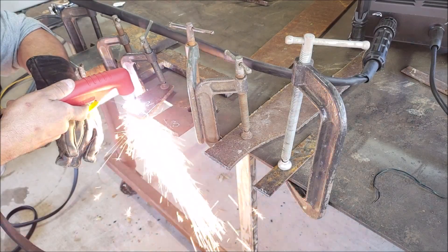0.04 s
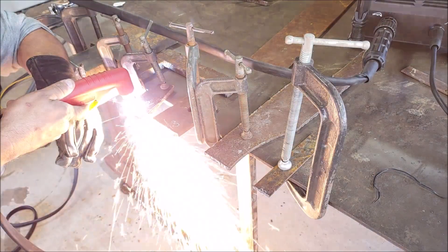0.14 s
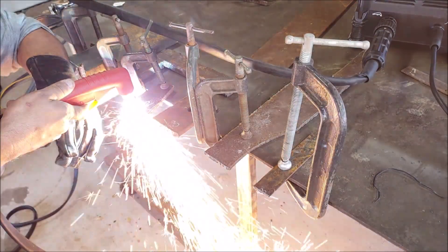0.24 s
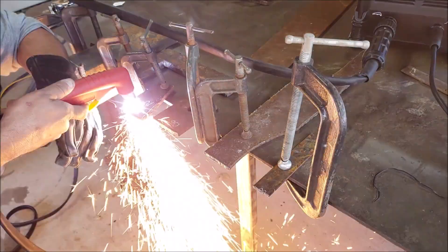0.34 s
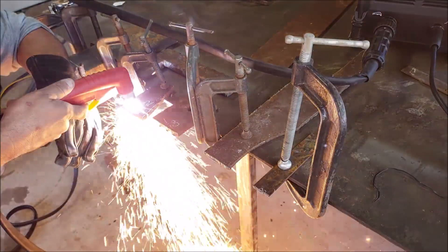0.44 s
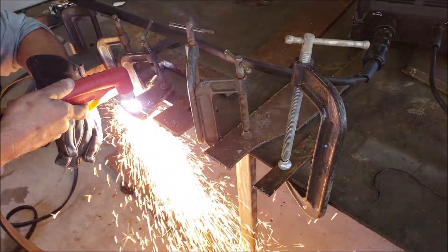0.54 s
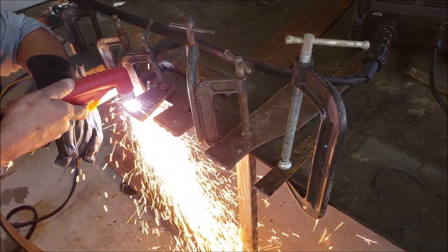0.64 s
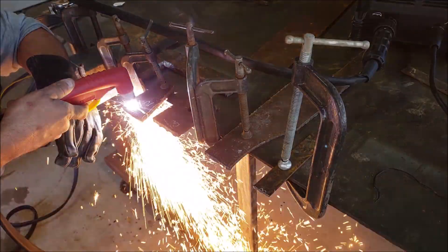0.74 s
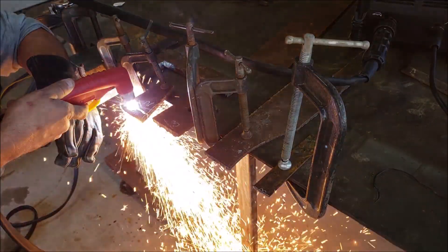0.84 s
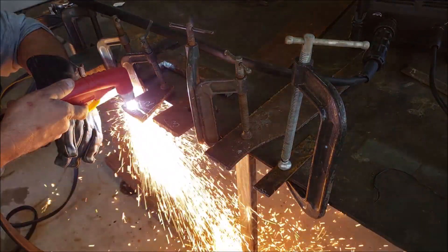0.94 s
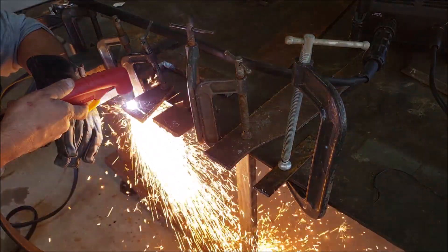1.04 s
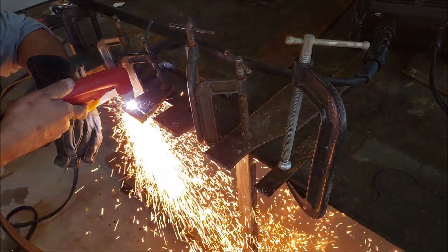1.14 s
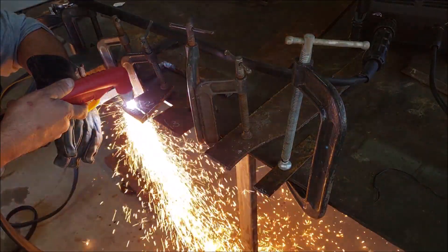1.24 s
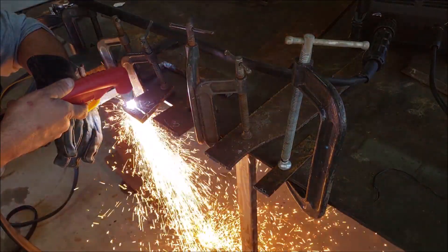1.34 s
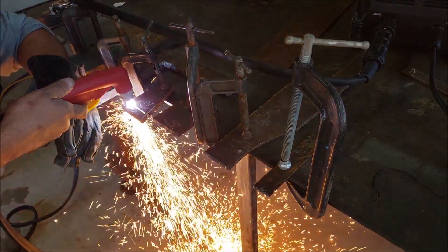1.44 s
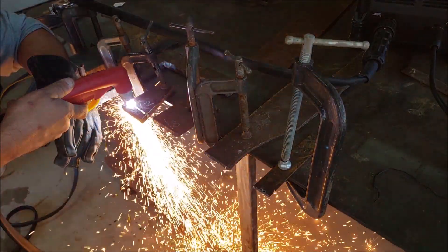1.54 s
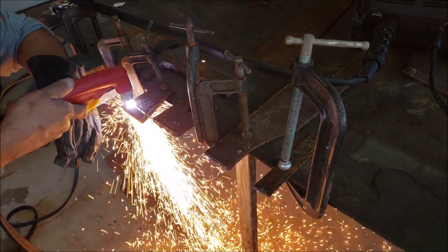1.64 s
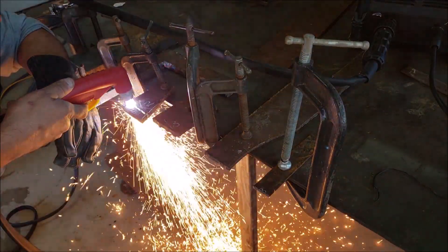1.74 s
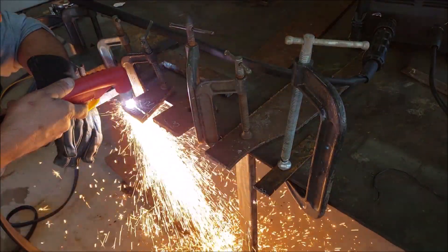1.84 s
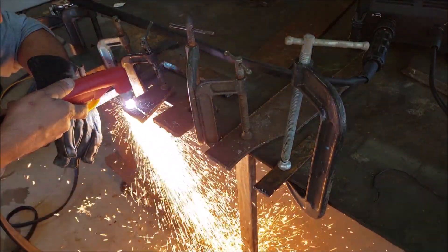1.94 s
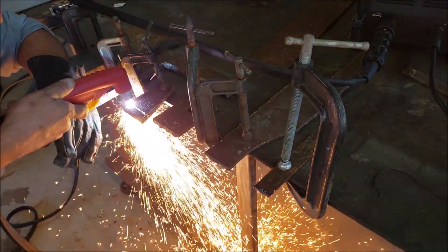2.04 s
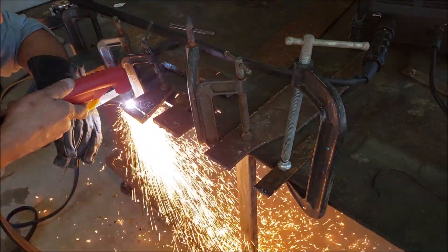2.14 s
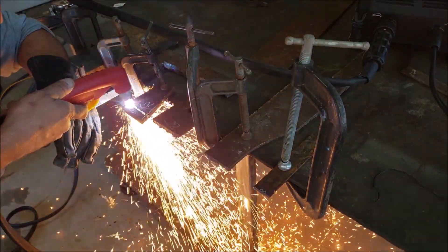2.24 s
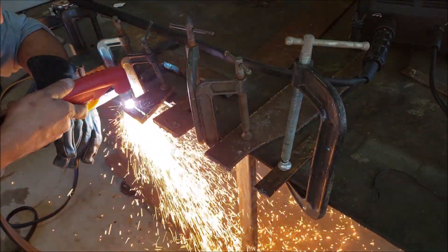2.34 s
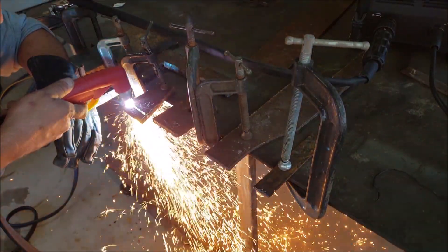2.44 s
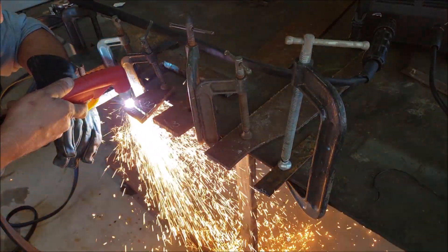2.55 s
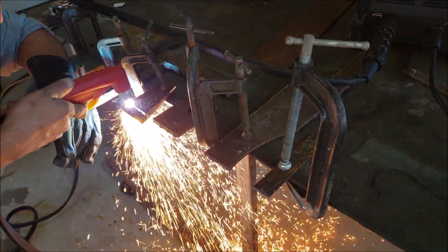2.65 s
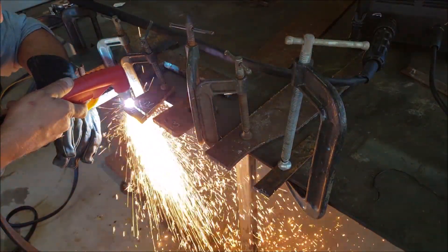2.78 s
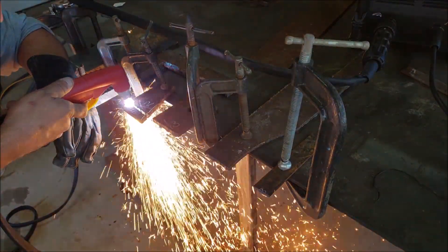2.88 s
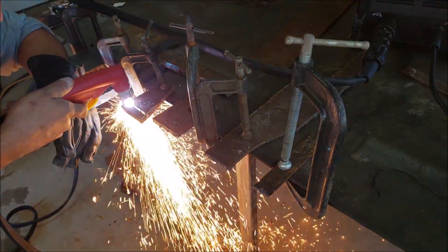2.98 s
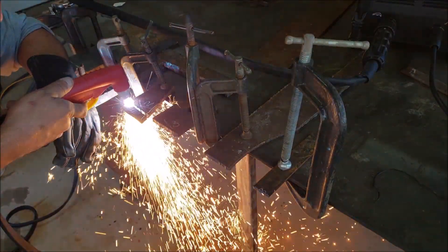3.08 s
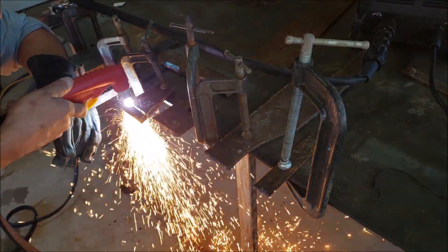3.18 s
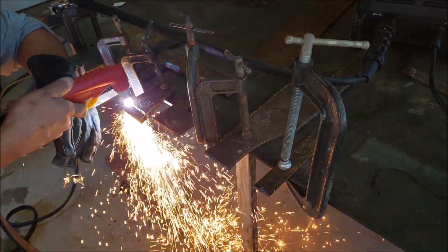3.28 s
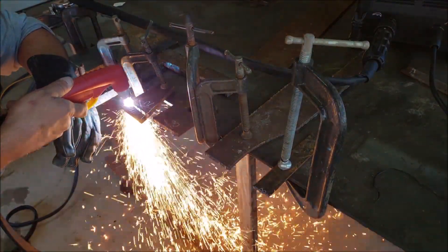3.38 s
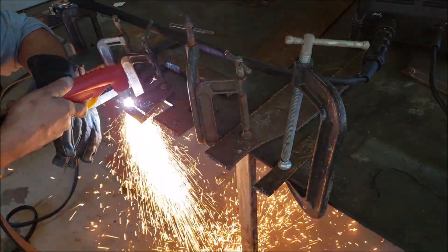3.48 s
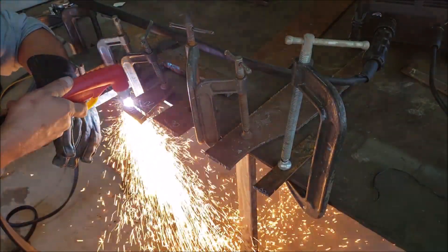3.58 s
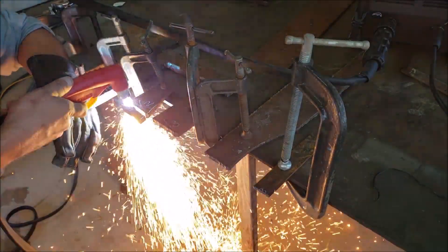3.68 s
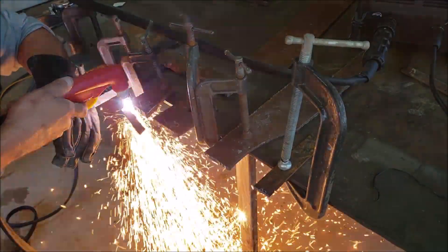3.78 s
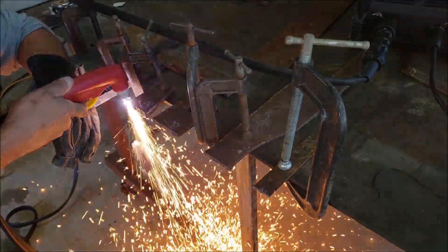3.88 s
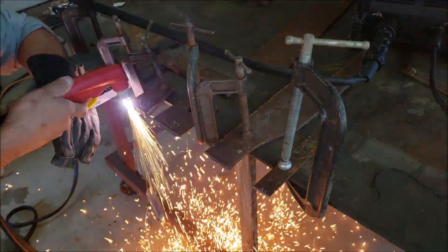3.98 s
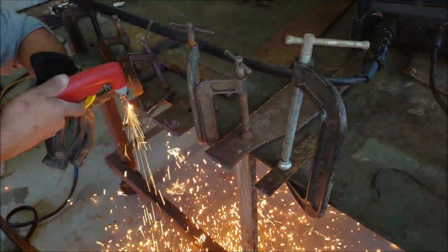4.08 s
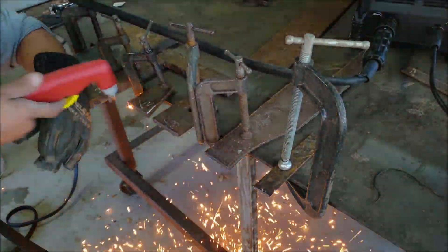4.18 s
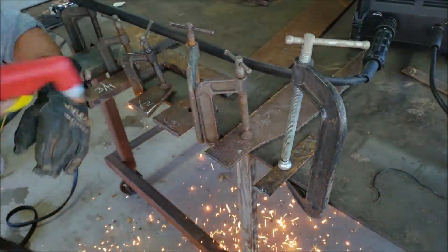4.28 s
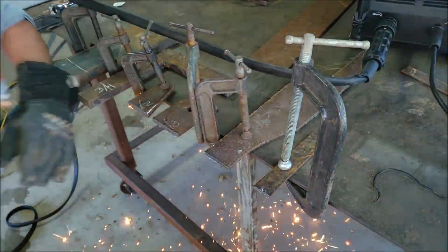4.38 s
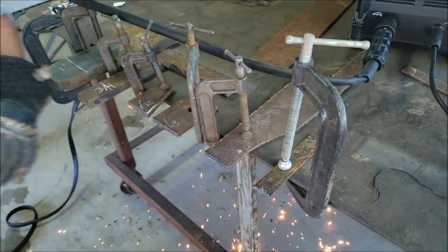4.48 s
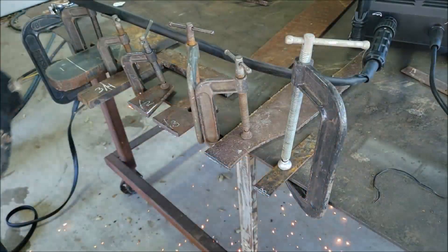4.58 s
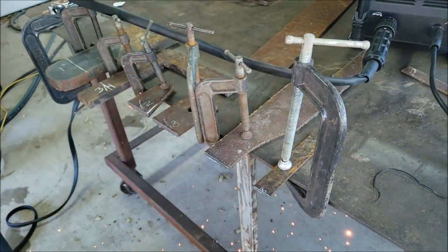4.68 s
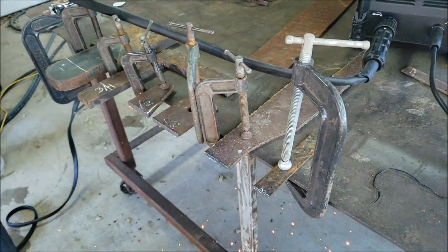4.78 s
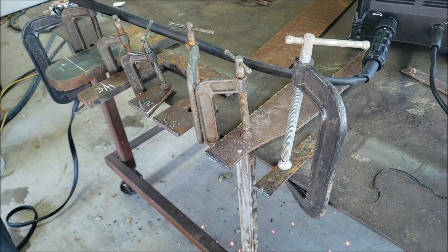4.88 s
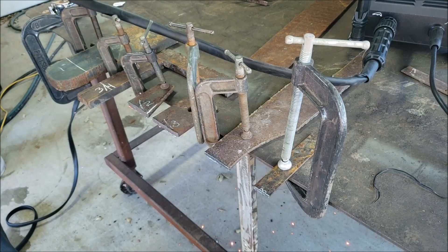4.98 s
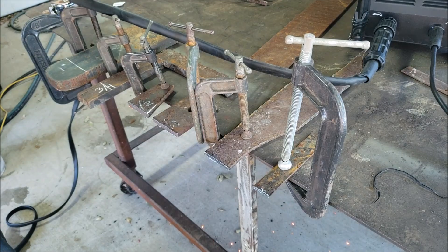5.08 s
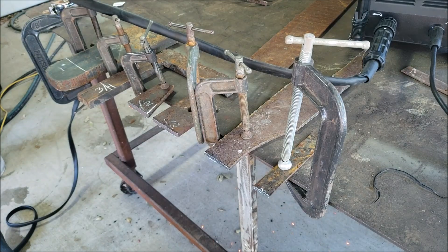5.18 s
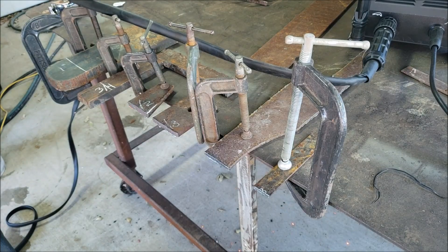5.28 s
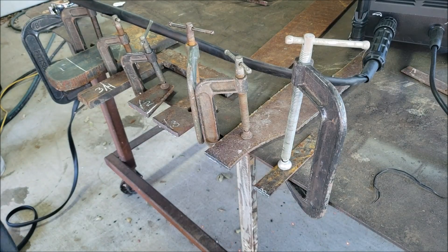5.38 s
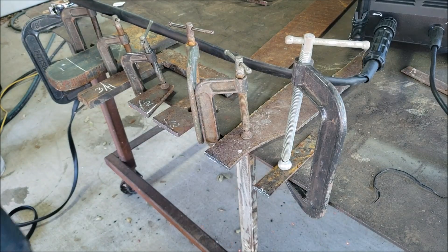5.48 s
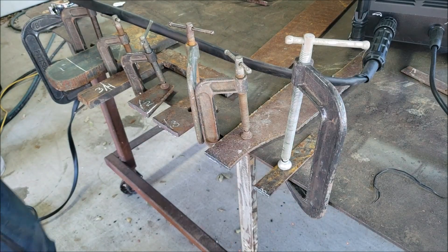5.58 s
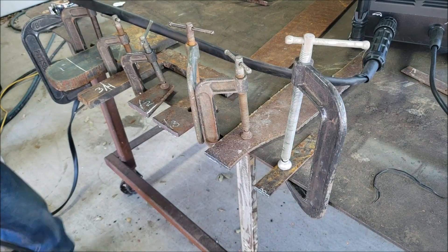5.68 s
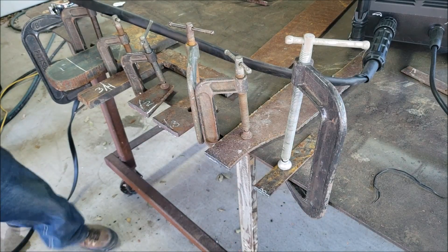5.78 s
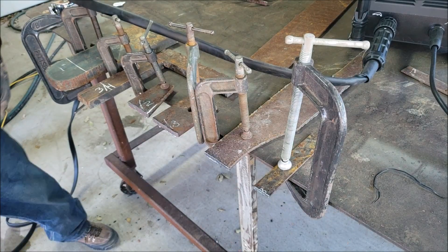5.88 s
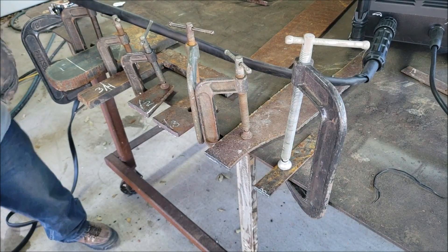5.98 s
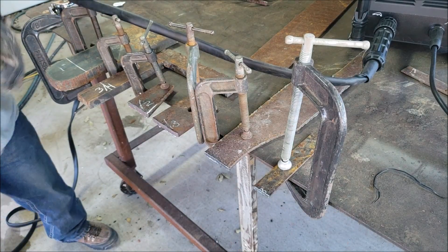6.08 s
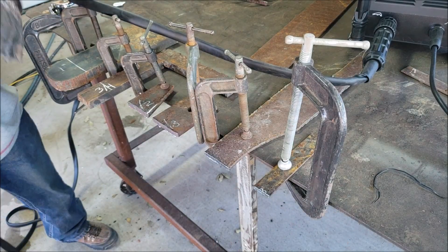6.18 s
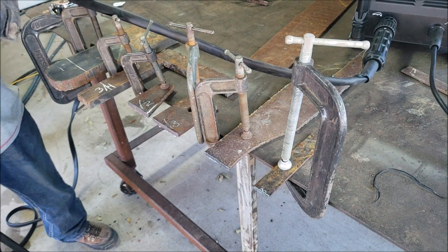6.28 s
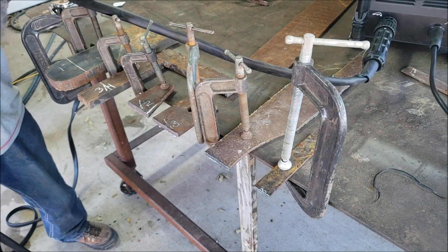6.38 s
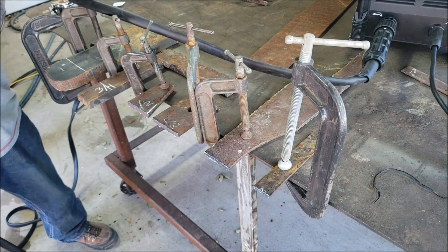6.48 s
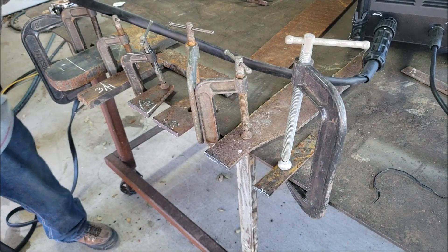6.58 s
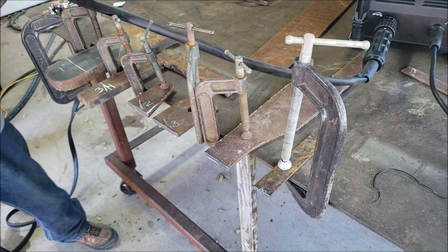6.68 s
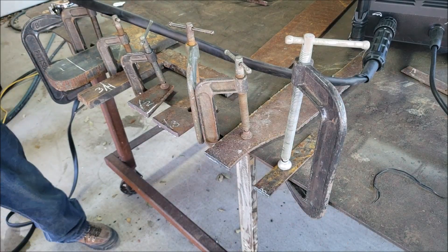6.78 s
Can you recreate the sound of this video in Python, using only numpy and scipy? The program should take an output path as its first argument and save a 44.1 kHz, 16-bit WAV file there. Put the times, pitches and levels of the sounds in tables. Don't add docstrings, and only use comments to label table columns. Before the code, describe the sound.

Harsh, bright cutting roar with spurts of molten metal ends abruptly in a pop, leaving soft cooling air that sweeps left and a low machine whir.

```python
import sys
import numpy as np
from scipy import signal
from scipy.fft import rfft, irfft, next_fast_len
from scipy.io import wavfile
from scipy.ndimage import uniform_filter1d, map_coordinates

SR = 44100
rng = np.random.default_rng(int(sys.argv[2]) if len(sys.argv) > 2 else 0)


def persist_wave(psi):
    counts = np.round(np.clip(psi, -1, 1) * 32767).astype(np.int16)
    wavfile.write(sys.argv[1], SR, np.atleast_2d(counts).T)


def gain_from_db(level_db):
    decades = np.asarray(level_db, float) / 20
    return 10 ** decades


N = 301203
SIZE, HOP = 256, 64
ARC_OUT = 4.077

# [f/Hz, t60/s]
WALLS_T60 = [(200, 0.29), (2000, 0.22), (8000, 0.27), (15000, 0.2)]
# [f/Hz, level/dB]
ROOM_LEVEL = [(40, 3.5), (200, 2), (1500, 1.5), (3300, 6), (4500, 1.5), (8000, 7.5), (12500, 0), (15000, 2)]
# [t/s, level/dB]
CAMERA_GAIN = [(4.3, 0), (4.9, -1), (5.5, 5), (6.0, 5.5), (6.5, 11.5), (6.83, 16)]
# [t/s, level/dB, half length/s]
AIR_SWEEPS = [
    (4.62, 5, .07),
    (5.33, 4.5, 0.16),
    (6.01, 2.5, 0.025),
]


def unit(x):
    return x / np.sqrt(np.mean(np.abs(x) ** 2) + 1e-20)


def along(points, hz):
    f, v = np.transpose(points)
    return np.interp(np.log(hz + 1), np.log(f + 1), v)


def curves(rows, t):
    s, *cols = np.transpose(rows)
    return [np.interp(t, s, c) for c in cols]


def swells(rows, t):
    return sum(db * np.exp(-((t - s) / half) ** 2) for s, db, half in rows)


def wobble(rate, count):
    step = rate * HOP / SR
    return map_coordinates(rng.standard_normal(int(count * step) + 4), [np.arange(count) * step])


def frames(x):
    hz, t, z = signal.stft(x, SR, nperseg=SIZE, noverlap=SIZE - HOP)
    return hz[:, None], t, z


def samples(z):
    return signal.istft(z, SR, nperseg=SIZE, noverlap=SIZE - HOP)[1][..., :N]


def filtered(x, response):
    m = next_fast_len(x.shape[-1] + 8192)
    spectrum = rfft(x, m) * response(np.fft.rfftfreq(m, 1 / SR))
    return irfft(spectrum, m)[..., :x.shape[-1]]


def diffuse(noise):
    spacing_m, alike = 0.13, 0.52

    def mix(hz):
        turn = np.arccos(alike * np.sinc(2 * hz * spacing_m / 343)) / 2
        return np.array([np.cos(turn), np.sin(turn)])

    mid, side = filtered(noise, mix)
    return np.array([mid + side, mid - side])


def effort(t):
    # [t/s, level/dB]
    cut = [(0, -22.5), (.04, -22), (.12, -23), (.18, -24.5), (.55, -26), (1.5, -29), (2.9, -27.5),
           (3.84, -27.5), (3.92, -26), (4.06, -28.5)]
    arc_parts = [-0.5, -13.5, -19, -32]
    air_parts = [0.5, -12.5, -19.5, -40.5]
    # [t/s, level/dB, half length/s]
    gouts = [
        (1.05, 13, 0.027),
        (1.95, 10.5, 0.08),
        (2.84, 15, 0.024),
        (3.29, 6, 0.036),
        (3.72, 9.5, 0.062),
        (4.05, 7, 0.016),
    ]
    gout_share = [0.019, 0.027, 0.13, 0.58]
    sweep_share = [1, 0.36, 0.36, .3]
    pierce_s, air_db = 0.27, -46
    unpierced_db = [-0.5, 0, -13.5, -6.5]

    def col(v):
        return np.array(v)[:, None]

    arc = curves(cut, t)[0] + col(arc_parts)
    arc = arc + col(unpierced_db) * np.clip(1 - t / pierce_s, 0, 1)
    arc = arc + col(gout_share) * swells(gouts, t)
    air = air_db + curves(CAMERA_GAIN, t)[0] + col(air_parts)
    air = air + col(sweep_share) * swells(AIR_SWEEPS, t)
    return np.where(t < ARC_OUT, arc, air)


def jet():
    parts_hz = [14000, 5280, 1500, 490]
    # [f/Hz, level/dB per Hz]
    colour = [(40, -75), (60, -29), (139, -19), (280, -41.5), (426, -21), (730, -28.5), (839, -21.5),
              (1190, -24), (2340, -18), (4300, -10.5), (6400, -9.5), (7500, -10), (8670, -14.5),
              (10400, -11), (12300, -3.5), (15900, -2)]
    hz, t, z = frames(rng.standard_normal((3, N)))
    sputter = (t < ARC_OUT) * wobble(14, count=len(t))
    depth_db = [0.11, 0.57, 0.34, 0.6]
    power = 0
    for k, db in enumerate(effort(t)):
        share = along(list(zip(parts_hz[::-1], np.arange(4)[::-1] == k)), hz)
        part = share * gain_from_db(2 * along(colour, hz))
        flicker_db = depth_db[k] * (sputter + 1.24 * wobble(30, count=len(t)))
        power = power + part / part.mean() * gain_from_db(2 * (db + flicker_db + 1.43))

    patches = uniform_filter1d(rng.standard_normal(power.shape), size=5, axis=0)
    patches = uniform_filter1d(patches, size=30, axis=1)
    power = power * gain_from_db(2.98 * unit(patches))

    keep = gain_from_db(-2 * 60 * HOP / SR / along(WALLS_T60, hz))[:, 0]
    stored = [signal.lfilter([1 - k], [1, -k], p, zi=[k * p[0]])[0] for k, p in zip(keep, power)]
    direct = samples(z[0] * np.sqrt(power))
    walls = samples(z[1:] * np.sqrt(np.array(stored)) * gain_from_db(along(ROOM_LEVEL, hz)))
    return direct, diffuse(walls)


def small_sounds():
    # [t/s, peak level/dB, time constant/ms]
    puffs = [
        (0.094, -36, 1.2),
        (4.077, -26.5, 0.1),
        (4.252, -45, 0.043),
    ]
    # [t/s, peak level/dB, f/Hz, t60/ms]
    ticks = [
        (4.251, -30.5, 1500, 2.6),
        (4.261, -30, 4330, 2.4),
        (6.002, -32, 2870, 6.1),
        (6.012, -44, 3150, 6),
    ]
    # [t/s, level/dB, f/Hz, half length/ms]
    whistles = [
        (3.735, -45, 415, 8.6),
        (3.77, -50, 623, 10),
        (3.82, -56, 386, 20),
        (4.271, -45, 11700, 4),
        (4.298, -46, 11800, 4.4),
        (6.005, -57, 2250, 12),
        (6.28, -60, 803, 19),
        (6.32, -61, 983, 25),
        (6.3, -62, 560, 23),
    ]
    out, t = np.zeros(N + SR), np.arange(SR // 10) / SR
    for s, db, ms in puffs:
        u = t * 1000 / ms
        out[round(s * SR):][:len(t)] -= gain_from_db(db + 12) * u * (1 - 0.97 * u) * np.exp(-u)
    for s, db, hz, ms in ticks:
        ring = np.sin(2 * np.pi * hz * t) + .5 * rng.standard_normal(len(t))
        out[round(s * SR):][:len(t)] -= gain_from_db(db - 60 * t * 1000 / ms) * ring
    for s, db, hz, ms in whistles:
        swell = np.exp(-((t - t.mean()) * 1000 / ms) ** 2)
        start = round((s - t.mean()) * SR)
        out[start:][:len(t)] += gain_from_db(db) * swell * np.sin(2 * np.pi * hz * t)
    return out[:N]


def room(x):
    hz, t, z = frames(rng.standard_normal((2, SR // 2)))
    decay = gain_from_db(-60 * t / along(WALLS_T60, hz))
    decay = decay / np.linalg.norm(decay, axis=1, keepdims=True)
    tail = diffuse(samples(z * decay * gain_from_db(along(ROOM_LEVEL, hz)) * np.sqrt(SR / HOP)))
    gap = int(.006 * SR)
    return signal.fftconvolve(np.pad(x, (gap, 0))[None], tail / np.sqrt(SR), axes=1)[:, :N]


def placed(x, walls):
    # [t/s, lead of the left microphone/ms]
    lead = [(4.1, .143), (4.22, .152), (4.34, .204), (4.4, .25), (4.46, .315), (4.55, .335), (4.6, .41),
            (4.66, .46), (4.76, .485), (5.08, .492), (5.19, .465), (5.26, .43), (5.33, .445), (5.41, .418),
            (5.47, .39), (5.55, .33), (6.3, .33), (6.6, .338)]
    # [t/s, left-right level/dB]
    turned = [(4.08, 3.8), (4.2, 0), (4.5, 1), (4.72, 4.5), (5.22, 4.5), (5.6, 1.6), (6.0, 1)]
    # [f/Hz, share of the left-right dB]
    shade = [(40, 1.3), (300, .55), (2500, .45), (4500, 0), (7500, -.2), (9500, .4), (12200, .05),
             (14500, 1.65)]
    # [f/Hz, left-right level/dB]
    shadow = [(2000, 0), (6000, 2.5), (9500, 6.5), (11500, 6), (13000, 4.5), (15000, 5.5)]
    # [f/Hz, level/dB]
    clear = [(1500, 1), (2500, -3.5), (3300, -9.5), (4500, -4), (5200, -1), (6200, -7), (7400, -4.5),
             (8400, -9), (10000, -5), (12000, -3), (13800, -4), (15300, 0)]
    front_ms, far_left_ms = .15, .5
    beam_clears = .55

    hz, t, z = frames(x)
    half = np.array([.5, -.5])[:, None, None]
    lead_ms = curves(lead, t)[0]
    direct = z * np.exp(2j * np.pi * hz * half * lead_ms / 1000)
    aside = np.clip((lead_ms - front_ms) / (far_left_ms - front_ms), 0, 1)
    pan_db = curves(turned, t)[0] * along(shade, hz) + aside * along(shadow, hz)
    out_of_kerf = np.clip((t - ARC_OUT - .04) / 0.3, 0, 1)
    clear_db = (along(clear, hz) - beam_clears * swells(AIR_SWEEPS, t)) * out_of_kerf
    both = direct + gain_from_db(clear_db) * frames(walls)[2]
    both = both / np.sqrt(1 + gain_from_db(2 * (along(ROOM_LEVEL, hz) + clear_db)))
    return filtered(samples(both * gain_from_db(half * pan_db + 3.5)), lambda f: f ** 2 / (f ** 2 + 45 ** 2))


def shop():
    # [f/Hz, level/dB per Hz]
    rumble_colour = [(15, -44), (30, -7.5), (96, -6), (262, -3), (339, -13), (405, -6.5), (608, -15.5),
                     (670, -7.5), (726, -20), (1200, -21), (1560, -33), (2640, -120)]
    # [f/Hz, width/Hz, level/dB under the rumble]
    fan_tones = [
        (102, 8, -14),
        (147, 7.4, -15),
        (266, 2.2, -25),
        (396, 3.5, -28),
    ]
    whine_hz, whine_db, whine_from_s = 679, -8.5, 5.7
    fan_up_s, fan_rise_s, fan_up_db = 6.06, .5, 7
    shop_db, shop_grows = -68.5, 1.07

    def shaped(response):
        return unit(filtered(rng.standard_normal((2, N)), response))

    t = np.arange(N) / SR
    rumble = shaped(lambda hz: gain_from_db(along(rumble_colour, hz)))
    fan = 0
    for centre, width, db in fan_tones:
        fan = fan + gain_from_db(db) * shaped(lambda hz: 1 / (1 + ((hz - centre) / width) ** 2))
    fan = fan * gain_from_db(fan_up_db * np.clip((t - fan_up_s) / fan_rise_s, 0, 1))
    hidden_db = 4.2 * np.clip((whine_from_s - t) / 0.42, 0, 1)
    phase = np.array([[0], [.6]])
    whine = gain_from_db(whine_db - hidden_db) * np.sin(2 * np.pi * whine_hz * t + phase)
    level_db = shop_db + shop_grows * curves(CAMERA_GAIN, t)[0]
    side_db = np.array([[1.8], [-1.2]])
    return gain_from_db(level_db + side_db) * diffuse(rumble + fan + whine)


def scene():
    hiss, stirred = jet()
    torch = hiss + small_sounds()

    def still(hz):
        return .4 / (1 + (hz / 5000) ** 4)

    walls = filtered(stirred, lambda hz: np.sqrt(1 - still(hz)))
    walls = walls + filtered(room(torch), lambda hz: np.sqrt(still(hz)))
    return placed(torch, walls) + shop()


def top_cut(x):
    return signal.sosfilt(signal.butter(12, 16600, fs=SR, output="sos"), x)


def record(dry):
    mix = filtered(dry, lambda hz: hz < 15770)
    return top_cut(mix)


dry = scene()
out = record(dry)
persist_wave(out)
```